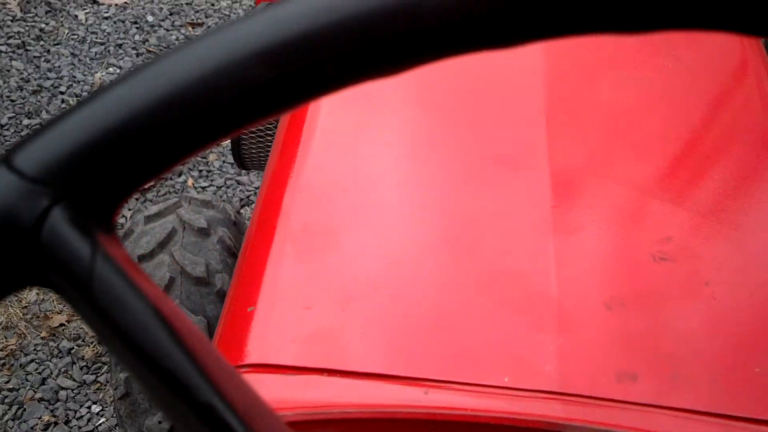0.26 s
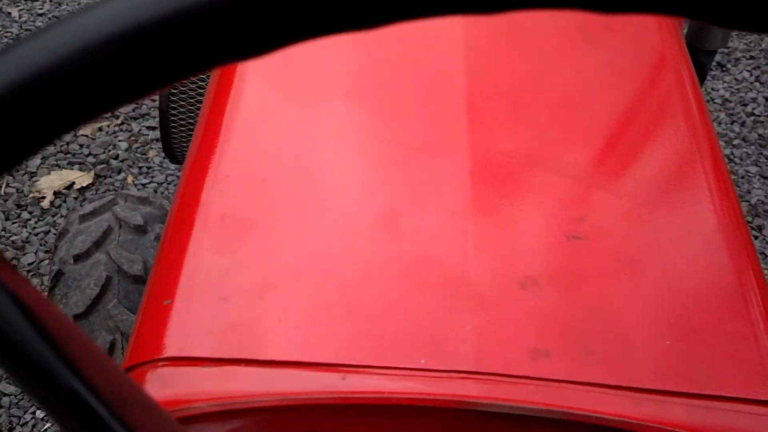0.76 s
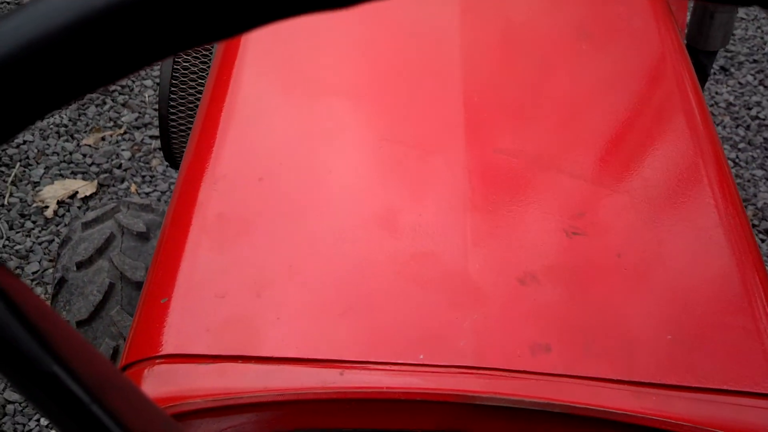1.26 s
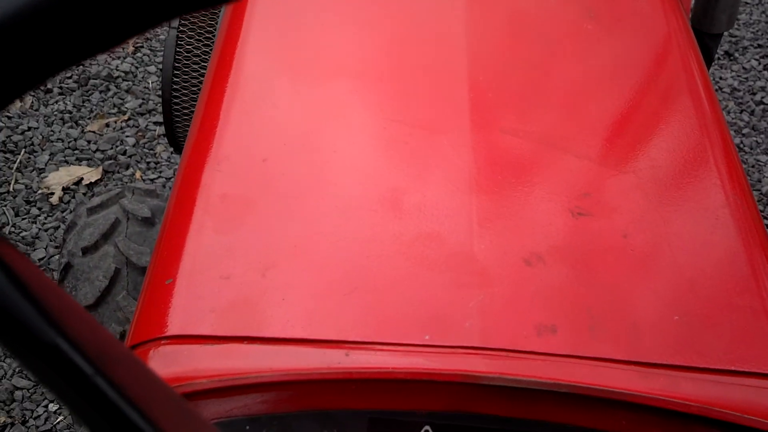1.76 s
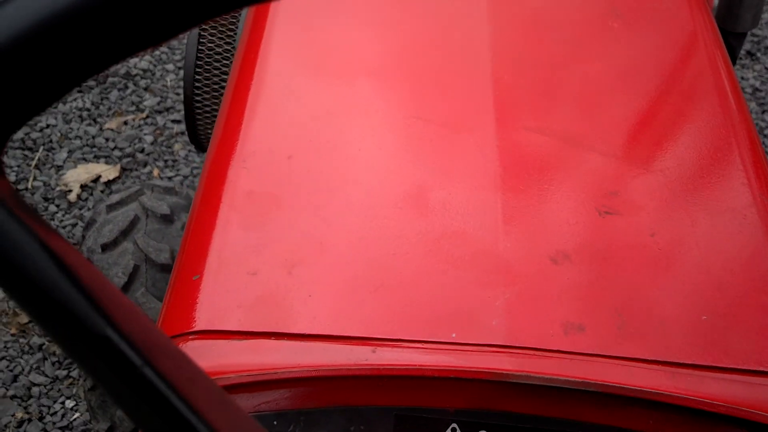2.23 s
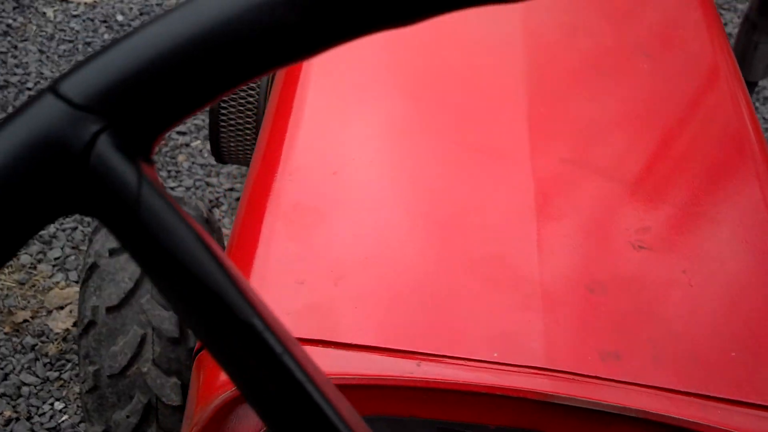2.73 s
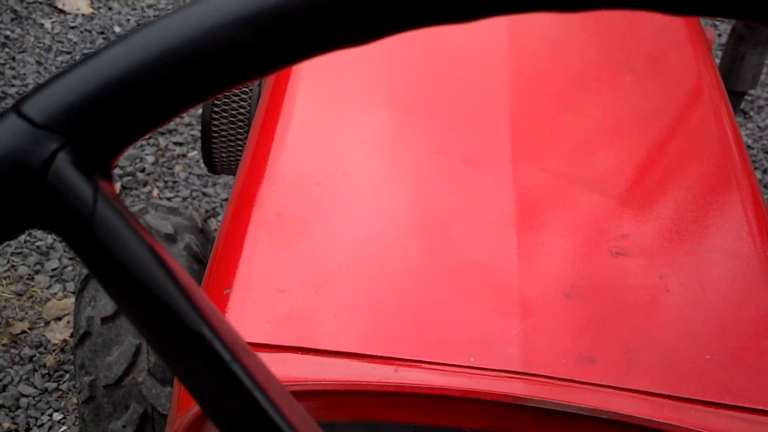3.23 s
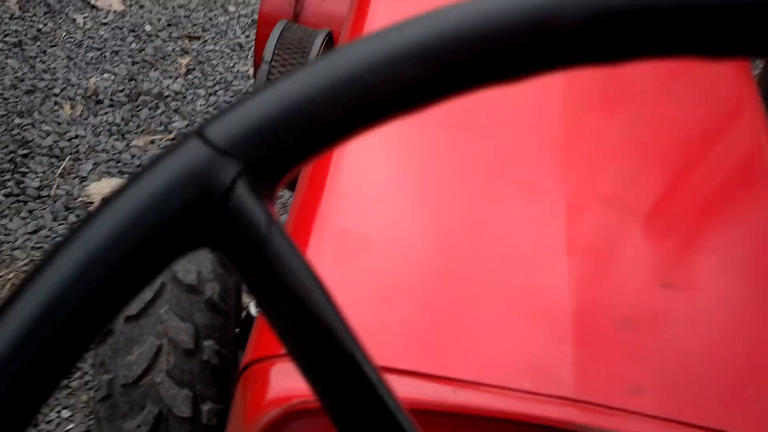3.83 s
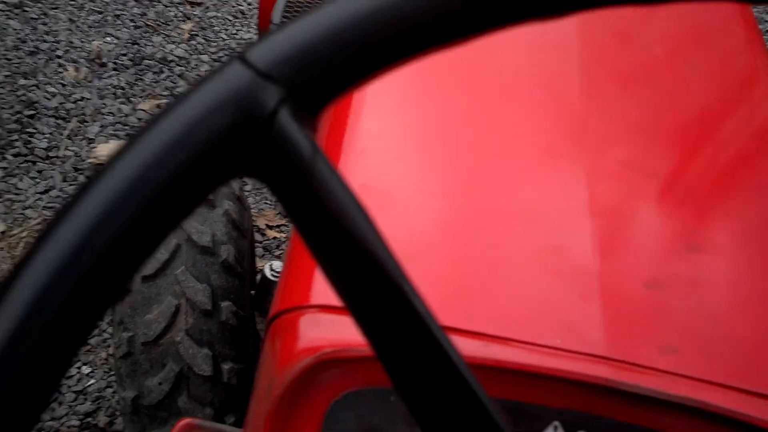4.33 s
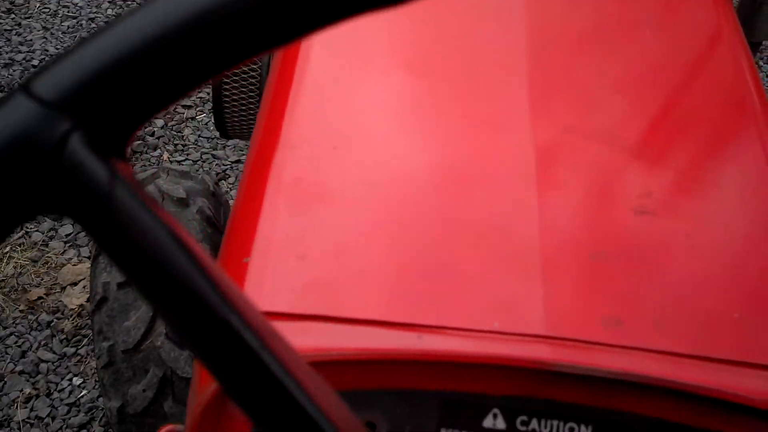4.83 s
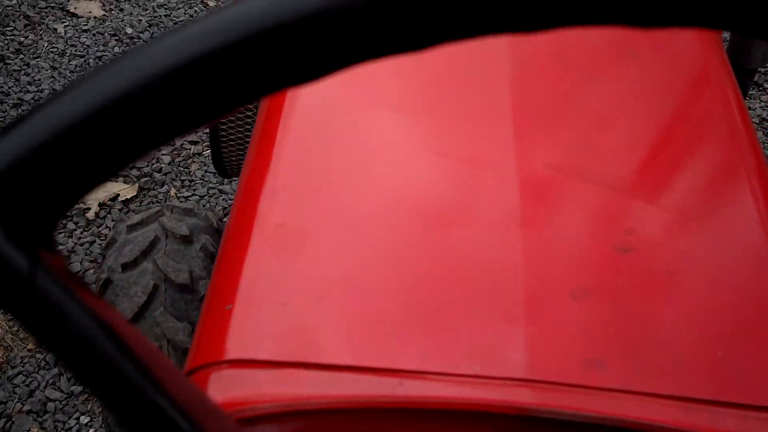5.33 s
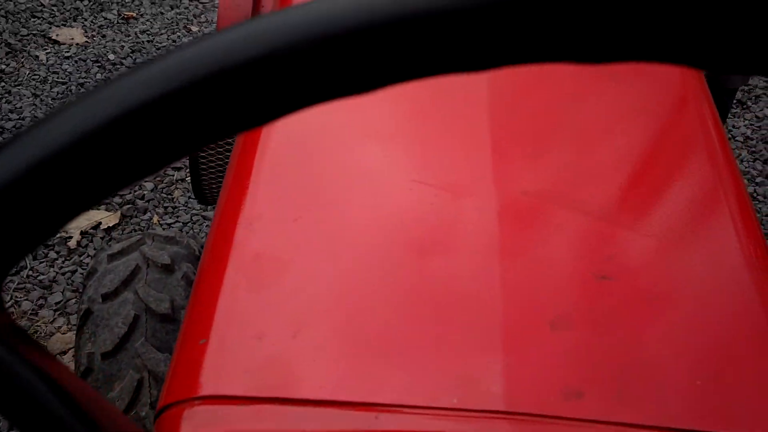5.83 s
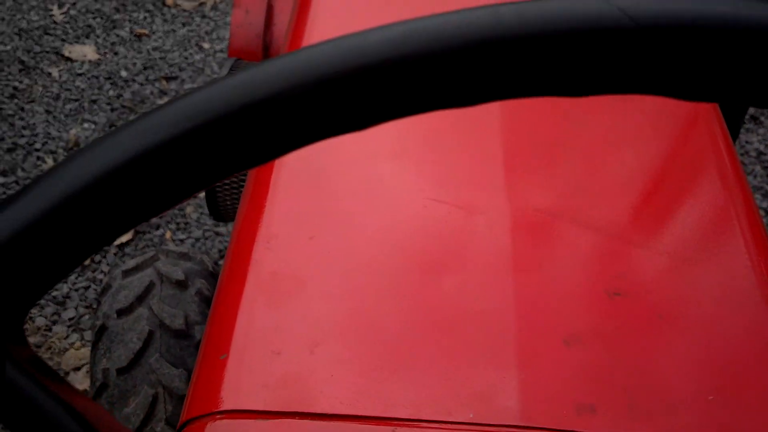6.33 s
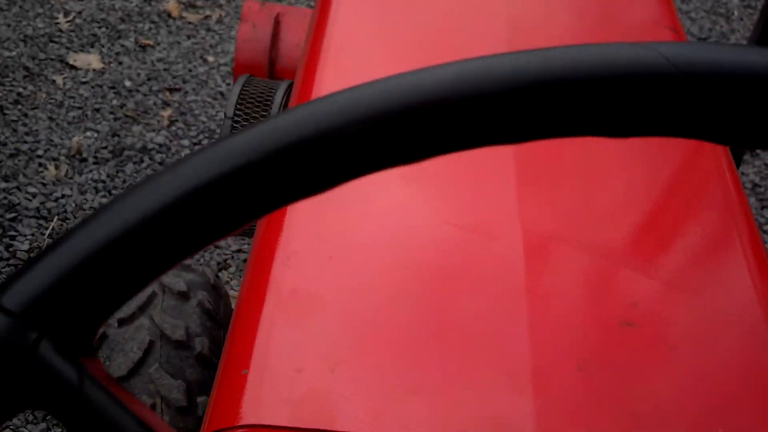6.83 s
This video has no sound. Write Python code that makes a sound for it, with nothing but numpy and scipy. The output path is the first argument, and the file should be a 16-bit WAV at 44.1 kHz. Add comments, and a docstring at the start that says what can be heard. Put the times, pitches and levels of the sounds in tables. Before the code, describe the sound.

A small tractor's electric starter whines and rattles through two cranking tries with thumping compressions, never firing, with bodywork knocks between them outdoors.

```python
"""A key scrapes and a solenoid clacks over a soft outdoor rush: a small tractor is cranked twice from the seat
and does not fire. The starter lurches into mesh, whines up to speed and rattles its gear teeth under the hood
(tooth contacts and tones at the mesh rate); the engine thumps at each compression (tone bursts) and coasts down
in loose clatter (random contacts). Metal rings and chirps (sines), and between the tries the bodywork is
knocked (ringing modes and noise) and thin squeaks judder."""
import sys
import numpy as np
from scipy import signal
from scipy.fft import rfft, irfft, next_fast_len
from scipy.io import wavfile
from scipy.ndimage import map_coordinates

SR = 44100
rng = np.random.default_rng(int(sys.argv[2]) if len(sys.argv) > 2 else 0)


def store_wav(level_fs):
    """Save 16-bit WAV to argv[1]."""
    pcm = np.round(np.clip(np.atleast_2d(level_fs), -1, 1) * 32767)
    wavfile.write(sys.argv[1], SR, pcm.T.astype(np.int16))


N = 312081
T = np.arange(N) / SR  # seconds

# Throughout, t60_s is the time to fall 60 dB, half_s the time from a burst's peak to 1/e,
# and rise_s the time over which a swell climbs its last 7.2 dB. Levels are relative, before the final mix.

# outdoor rush, level over time: start_s, level_db
AIR = [(0, -49.5), (3, -44), (3.3, -44.5), (3.55, -42), (3.8, -39), (4.2, -36.5), (4.75, -37.5),
       (5.2, -45.5), (7.08, -41.5)]
# colour of the outdoor rush: freq_hz, gain_db
OUTDOORS = [(30, -28), (60, -18.5), (100, -8), (160, -2), (300, -1.6), (600, -7.5), (1200, -17.5),
            (2500, -25.5), (5000, -34), (10000, -40.5), (15500, -37)]

# solenoid, key and lever clicks: start_s, level_db, t60_s
CLICKS = [(0.0162, -15, 0.026), (3.029, -44, 0.11), (3.3456, -46, 0.017), (3.5719, -26, 0.015),
          (3.878, -35.5, 0.021), (4.389, -34, 0.052), (4.829, -15.5, 0.03), (7.043, -54, .04)]
# the key scraping in its switch: start_s, level_db, t60_s
KEY_SCRAPES = [(.001, -19, 0.063), (.082, -28, 0.06), (2.457, -20.5, 0.085), (2.57, -41, 0.14),
               (3.031, -49, 0.03), (4.8122, -23, 0.023), (4.872, -34.5, 0.14), (6.686, -21, 0.1)]
# colour of the clicks: freq_hz, gain_db
CLICK_COLOUR = [(200, -13), (600, -10), (1100, 3.5), (2000, 10.5), (3000, 9.5), (4400, 2.5), (6000, 5),
                (9000, 3.5), (12500, 3), (15500, 2.5)]
# colour of the key scrapes: freq_hz, gain_db
SCRAPE_COLOUR = [(2000, -29), (4500, -7), (7500, -10), (9300, 6), (12500, -11), (15500, -2)]

# compression strokes of the engine: start_s, peak_db
STROKES = [(.058, -23), (.688, -20.5), (1.022, -17), (1.34, -16), (1.657, -16), (1.976, -16), (2.298, -15),
           (2.482, -23), (2.665, -22), (4.868, -19), (5.247, -24), (5.902, -18), (6.215, -16), (6.541, -16),
           (6.713, -22), (6.933, -24)]
# the pinion taking up the load or kicking out of mesh: peak_s, level_db, rise_s, t60_s
LURCHES = [(0.065, -19.5, 0.014, 0.21), (4.874, -20, 0.014, 0.24), (6.73, -27.5, 0.0099, 0.42)]
# colour of the lurches and the shudder: freq_hz, gain_db
LURCH_COLOUR = [(40, -18), (90, -60), (170, 4.5), (260, -0.5), (450, -4.5), (900, -9.5), (1700, -11),
                (3000, -24), (6000, -31.5), (12000, -39), (15500, -42)]
# the thump of the intake: pitch_hz, level_db, half_s
INTAKE = [(90, -19, .005), (185, -10.5, .006), (265, -2.5, .007)]
THUMP_DELAY_S = 0.00587  # from the top of the stroke to the intake's thump
THUMP_SCATTER = 0.043  # pitch spread from thump to thump, as a share

# pinion on the ring gear, one curve per try, before load and ripple: start_s, tooth_rate_hz
MESH = [
    [(.1, 340), (.3, 355), (.36, 442), (.42, 514), (.484, 504), (.554, 519), (.615, 512), (.66, 570),
     (1.05, 658), (1.2, 667), (2.46, 665)],
    [(4.95, 340), (5.07, 400), (5.13, 385), (5.18, 455), (5.245, 450), (5.31, 512), (5.35, 518),
     (5.42, 550), (5.6, 580), (6.02, 664), (6.7, 660)],
]
# the tries: takes_hold_s, key_let_go_s, whirr_db
TRIES = [(.1, 2.465, 0), (4.91, 6.7, -2.5)]
FULL_HZ = 668  # tooth rate at full cranking speed
RELEASE_T60_S = 0.11  # the gear noise dies once the key is let go
# speed ripple (Hz, share), jitter (share), added jitter per octave of lower speed (share)
RIPPLE_HZ, RIPPLE, JITTER, SLOW_JITTER = 11.5, .007, .007, .002
# the pinion: teeth, swing of the rasp once a turn (dB), gain of the scrape of its worn flanks (dB)
PINION_TEETH, ECCENTRIC_DB, WEAR_DB = 14, 1.5, -4
# gear noise at full speed (dB) and what it loses per octave of lower speed (dB)
CLATTER_DB, CLATTER_DB_PER_OCT = -26, 15
RASP_DB, RASP_DB_PER_OCT, RASP_STALL_DB = -34, 18.5, 10.5
CHURN_DB, CHURN_DB_PER_OCT, GROAN_DB = -31, 29, -37  # GROAN_DB: floor of the churn at low speed
# a compression loads the gears, lets them go slack, then the crank catches up: delay_s after stroke, width_s
SQUEEZE, SLACK, CATCH_UP = (-0.012, 0.048), (0.047, 0.027), (0.094, 0.027)
SQUEEZE_DB, SLACK_CLATTER_DB, SLACK_CHURN_DB, CATCH_UP_DB = 2, -3, -5, 4.5
# resonances of the starter housing and hood: freq_hz, width_hz, peak_db
HOOD_MODES = [(360, 38, 10), (453, 30, 4), (514, 35, 2.5), (650, 46, 9), (908, 40, 8), (978, 45, 8),
              (1032, 42, 10), (1198, 30, 5), (1328, 55, 7), (1470, 50, 5), (1545, 35, 4.5), (1665, 40, 7),
              (1786, 32, 6), (1981, 90, 6), (2235, 45, 8), (2336, 35, 6), (3010, 80, 8), (3326, 110, 3),
              (3630, 45, 3), (3875, 60, 11), (4135, 55, 8), (4410, 120, 9), (4625, 50, 5), (5394, 97, 8),
              (6890, 140, 7), (7250, 110, 5)]
# overall colour of the starter housing and hood: freq_hz, gain_db
HOOD_COLOUR = [(20, -29), (55, -24), (100, -32.5), (180, 2.5), (270, -1.5), (500, -8.5), (800, -5),
               (1300, -3), (2200, -6.5), (3200, -13.5), (4900, -19.5), (7000, -20.5), (9000, -27.5),
               (13000, -32), (15600, -35)]

# the mesh singing as the motor gathers speed, one curve per try: start_s, level_db
WHINE = [
    [(.12, -46), (.3, -42), (.355, -29), (.42, -27), (.465, -23.5), (.52, -27), (.56, -39), (.605, -28),
     (.66, -36), (.72, -43), (.95, -41)],
    [(4.96, -46), (5.06, -29), (5.145, -42), (5.18, -25), (5.245, -23.5), (5.33, -28), (5.39, -37),
     (5.52, -39), (5.6, -46)],
]
# colour of the teeth grinding under the run-up load: freq_hz, gain_db
GRIND_COLOUR = [(100, -37), (400, -10), (1000, -40), (2200, 2), (3000, -5), (6000, -17), (15000, -26)]
# octave level, tooth rate where overtones are richest, richness lost per octave away from it
WHINE_OCTAVE_DB, HARDEST_HZ, RICHNESS_DB_PER_OCT = -6, 510, 20
OVERTONE_STEP_DB = -2.5  # each higher overtone against the one below
CHATTER = .25  # depth of the tooth chatter on the overtones, as a share

# the whirr at full speed: multiple_of_tooth_rate, level_db, extra_db under load
WHIRR = [(1, -35.5, 5), (2, -39, 1), (3, -49, 3)]
# the starter housing singing along: pitch_hz, level_db, extra_db under load
HOUSING = [(360, -41, -5), (1032, -41, 5), (1667, -48, 2), (1786, -50.5, 2), (3867, -51, 0),
           (4133, -55.5, 0), (4410, -57, 0)]
HOUSING_DRIFT = .17  # phase drift of the housing tones, in turns
# loss per octave of lower speed (dB), throb (dB), phase roughness (radians)
WHIRR_DB_PER_OCT, THROB_DB, WHIRR_ROUGH = 65, 3.2, .5

# the pinion ringing as it springs back, and as the engine rocks: start_s, level_db
PINION_JOLTS = [(2.465, -39), (2.85, -48.5), (6.7, -36)]
PINION_HZ, PINION_T60_S = 1165, 1.9
# slipping metal chirping: peak_s, pitch_hz, level_db, half_s, glide_octaves_per_s
CHIRPS = [(5.546, 480, -19, .004, -8), (5.545, 975, -18, .008, -10), (5.549, 3600, -20, .004, -5),
          (5.555, 3600, -25, .003, -5), (5.556, 3240, -20, .007, -7), (5.65, 800, -37, .05, -1.5),
          (5.65, 1680, -32, .03, 2), (5.73, 1460, -35, .05, -1.3), (6.857, 915, -19.5, .0045, -5)]

# loose parts rattling as the engine runs out and rocks back: peak_s, level_db, rise_s, t60_s
RATTLES = [(2.51, -26, 0.043, 0.57), (2.6, -33.5, 0.025, 0.24), (2.73, -42, 0.034, 0.24),
           (2.83, -36.5, 0.037, 0.41), (2.895, -34.5, 0.041, 0.33), (6.71, -26, 0.095, 1.42),
           (7.05, -35, 0.0075, 0.42)]
# colour of the run-out rattle: freq_hz, gain_db
RUNOUT_COLOUR = [(50, -35), (100, -44), (180, 8.5), (300, 6.5), (600, -3.5), (1100, -2), (1800, -6),
                 (3000, -13), (6000, -25), (12000, -32), (15500, -36)]
# the flywheel ringing under the run-out rattle: freq_hz, width_hz, peak_db
FLYWHEEL = [(1165, 40, 9), (1740, 160, 7)]

# knocks on the bodywork: start_s, level_db, contact_s
KNOCKS = [(3.345, -32.5, .0002), (3.502, -14.5, 0.00027), (3.594, -17, 0.0033), (3.661, -13.5, 0.0047),
          (3.906, -24.5, .0001), (4.389, -27, 0.0003), (7.042, -45, 0.00043)]
# colour of the dull part of the knocks: freq_hz, gain_db
KNOCK_COLOUR = [(60, -49), (130, -12), (240, -4.5), (420, -21), (660, -7), (900, -17), (1200, -16),
                (2000, -25), (4000, -33.5), (8000, -40.5), (15000, -42)]
# modes of a body panel: pitch_hz, level_db, t60_s
PANEL = [(185, -12, .16), (236, -9, .13), (292, -5, .2), (350, -10, .2), (600, -12, .07), (764, -17, .12),
         (1000, -14, .07), (1165, -22, .2), (1800, -18, .06)]
# hollow clunk inside one knock: peak_s, pitch_hz, level_db, half_s, glide_octaves_per_s
CLUNKS = [(3.507, 660, -16.5, .006, 14), (3.511, 255, -23, .006, 0)]

# faint squeaks before the second try: peak_s, pitch_hz, level_db, rise_s, t60_s
SQUEAKS = [(4.645, 3380, -46, .003, .05), (4.664, 3440, -49, .012, .14), (4.671, 6070, -51, .02, .12),
           (4.723, 3380, -43, .003, .11), (4.72, 6070, -54, .003, .06)]

# ring of the engine bay: freq_hz, t60_s
BAY = [(200, 0.11), (1500, 0.27), (6000, 0.24), (14000, 0.036)]
# phase by which the left microphone leads: freq_hz, lead_radians
LEAD = [(0, -2.9), (60, -2.55), (125, -1.65), (250, -.8), (400, -.6), (650, -1.3), (900, -.55), (1378, 0),
        (2000, 1.5), (2756, np.pi), (16536, 11 * np.pi)]
# left level minus right level for the tractor: freq_hz, balance_db
BALANCE = [(100, 0.5), (250, -2), (400, 4), (560, 7.5), (750, 2.5), (1100, 1), (1550, -0.5), (1900, 1),
           (2700, 0), (5500, 0), (8000, -.8)]
TOP_HZ = 15850  # upper band limit


def amp(db):
    """Decibels to gain."""
    return 10 ** (np.asarray(db) / 20)


def unit(x):
    """Scale to rms 1."""
    return x / np.sqrt(np.mean(x ** 2) + 1e-20)


def along(points, hz):
    """Read a (freq_hz, value) curve on a log frequency axis."""
    freq, value = np.transpose(points)
    return np.interp(np.log(hz + 1), np.log(freq + 1), value)


def wobble(rate):
    """A smooth random curve with rate knots a second."""
    return map_coordinates(rng.standard_normal(int(N * rate / SR) + 4), [T * rate])


def filtered(x, response):
    """Multiply the spectrum of x by a complex response of frequency."""
    size = next_fast_len(N + SR // 2, True)
    return irfft(rfft(x, size) * response(np.fft.rfftfreq(size, 1 / SR)), size)[..., :N]


def coloured(x, curve):
    """Pass x through the causal, minimum-phase filter whose gain in dB is curve(hz)."""
    size = 8192
    cepstrum = irfft(np.log(amp(curve(np.fft.rfftfreq(size, 1 / SR)))))
    # folding the cepstrum onto positive time makes the filter causal
    cepstrum[1:size // 2] *= 2
    cepstrum[size // 2 + 1:] = 0
    impulse = irfft(np.exp(rfft(cepstrum)))
    return np.apply_along_axis(signal.oaconvolve, -1, x, impulse)[..., :N]


def noise(colour):
    """Noise of rms 1 with a given colour."""
    return unit(coloured(rng.standard_normal(N), lambda hz: along(colour, hz)))


def impacts(rate, spread_db):
    """Random small contacts of uneven size, about rate a second, at rms 1."""
    hits = rng.random(N) < rate / SR
    return unit(hits * rng.standard_normal(N) * amp(spread_db * rng.standard_normal(N)))


def resonances(modes, hz):
    """Gain in dB of a set of resonant peaks."""
    return sum(db / (1 + (2 * (hz - centre) / width) ** 2) for centre, width, db in modes)


def strike(start, t60, attack=0.00014):
    """The envelope of a blow: a fast exponential attack and a decay that is straight in dB."""
    t = np.maximum(T - start, 0)
    return (1 - np.exp(-t / attack)) * amp(-np.minimum(60 * t / t60, 200))


def swells(rows):
    """Envelopes that rise to a peak and die away, both straight in dB."""
    total = 0
    for peak, db, rise, t60 in rows:
        drop_db = np.maximum(7.2 * (peak - T) / rise, 60 * (T - peak) / t60)
        total = total + amp(db - np.clip(drop_db, 0, 200))
    return total


def blips(rows):
    """Short tone bursts under a bell-shaped envelope, gliding in pitch."""
    out, t = np.zeros(N + SR), np.arange(-SR // 20, SR // 20) / SR
    for peak, hz, db, half, glide in rows:
        turns = np.cumsum(hz * 2 ** (glide * t)) / SR
        tone = np.sin(2 * np.pi * (turns - np.interp(0, t, turns)))
        out[round(peak * SR) - len(t) // 2:][:len(t)] += amp(db) * np.exp(-(t / half) ** 2) * tone
    return out[:N]


def outdoors():
    """A soft low rush: coloured noise, partly different in its two channels."""
    pair = noise(OUTDOORS) + 0.75 * np.array([noise(OUTDOORS), noise(OUTDOORS)])
    level_db = np.interp(T, *np.transpose(AIR))
    return unit(pair) * amp(level_db + 0.77 * wobble(14))


def controls():
    """Sharp noise clicks with a faint metallic tail, and the bright scrape of the key."""
    snaps = sum(amp(db) * (strike(s, t60) + amp(-15) * strike(s, 5.2 * t60)) for s, db, t60 in CLICKS)
    scrapes = sum(amp(db) * strike(s, t60, attack=t60 / 20) for s, db, t60 in KEY_SCRAPES)
    return snaps * noise(CLICK_COLOUR) + scrapes * noise(SCRAPE_COLOUR)


def engine():
    """Noise lurches as the pinion loads or unloads, and a thump and a shudder at every compression."""
    detune = 1 + THUMP_SCATTER * rng.standard_normal(len(STROKES))
    thumps = blips([(s + THUMP_DELAY_S, hz * ratio, stroke_db + mode_db, half, 0)
                    for (s, stroke_db), ratio in zip(STROKES, detune) for hz, mode_db, half in INTAKE])
    # the block shudders as the piston goes over the top
    shudder = amp(-17) * sum(amp(db) * np.exp(-((T - s) / 0.017) ** 2) for s, db in STROKES)
    return (swells(LURCHES) + shudder) * noise(LURCH_COLOUR) + thumps


def tooth_rate():
    """Tooth rate in Hz before load and ripple, over both tries."""
    return np.interp(T, *np.concatenate(MESH).T)


def slowness():
    """Octaves by which the motor runs below full cranking speed."""
    return np.log2(FULL_HZ / tooth_rate())


def each_stroke(phase):
    """A smooth bump at one (delay_s, width_s) phase of every compression, 1 for the strongest stroke."""
    delay, width = phase
    top_db = max(db for s, db in STROKES)
    return sum(amp(db - top_db) * np.exp(-np.minimum(((T - s - delay) / width) ** 2, 50))
               for s, db in STROKES)


def powered():
    """Gain of the starter: up as it takes hold, steady, dying when the key is let go."""
    attack_s = 0.041
    return sum(np.clip((T - on) / attack_s + 1, 0, 1)
               * amp(-np.clip(60 * (T - off) / RELEASE_T60_S, 0, 200)) for on, off, db in TRIES)


def mesh_turns():
    """Count of teeth that have passed; the motor sags against each compression and its speed ripples."""
    sag = .007 * sum(np.exp(-((T - s) / .03) ** 2) for s, db in STROKES)
    ripple = RIPPLE * np.sin(2 * np.pi * RIPPLE_HZ * T + wobble(5))
    jitter = (JITTER + SLOW_JITTER * slowness()) * wobble(110)
    return np.cumsum(tooth_rate() * (1 - sag + ripple + jitter)) / SR


def worn_flanks(turns):
    """The same rough tooth flanks come round with every turn of the pinion: a dense comb of partials."""
    partials, size = 170, 4096
    surface = irfft(np.r_[0, np.exp(2j * np.pi * rng.random(partials))], size)
    return unit(np.interp(turns, np.arange(size) / size, surface, period=1))


def hood(hz):
    """Gain in dB of the starter housing and the hood."""
    return along(HOOD_COLOUR, hz) + resonances(HOOD_MODES, hz)


def gear_noise(teeth):
    """Teeth meet at the mesh rate, rattle in their backlash and ring the hood; faster is louder and brighter."""
    meetings = np.diff(np.floor(teeth), prepend=0) * amp(rng.standard_normal(N))
    rattle = 0.79 * impacts(rate=2000, spread_db=0)
    force = 0.31 * unit(meetings) + rattle + amp(WEAR_DB) * worn_flanks(teeth / PINION_TEETH)
    # each flank of the hood also rattles by itself
    force = force + np.array([impacts(rate=3000, spread_db=1) for flank in range(2)])
    sound = coloured(force, hood)

    # three bands: low churn, middle clatter, high rasp
    low = lambda hz: 1 / (1 + (hz / 520) ** 6)
    high = lambda hz: 1 - 1 / (1 + (hz / 2600) ** 8)
    churn_band = lambda hz: low(hz) * (1 - 0.5 / (1 + (hz / 300) ** 8))
    slow, slack = slowness(), each_stroke(SLACK)
    churn_db = np.maximum(CHURN_DB - CHURN_DB_PER_OCT * slow, GROAN_DB)
    churn_db = churn_db + SLACK_CHURN_DB * slack + CATCH_UP_DB * each_stroke(CATCH_UP)
    clatter_db = CLATTER_DB - CLATTER_DB_PER_OCT * slow
    clatter_db = clatter_db + SQUEEZE_DB * each_stroke(SQUEEZE) + SLACK_CLATTER_DB * slack
    # near a stall the teeth roll rather than scrape
    rasp_db = RASP_DB - RASP_DB_PER_OCT * slow - RASP_STALL_DB * slow ** 4
    # a slightly eccentric pinion scrapes harder once a turn
    rasp_db = rasp_db + ECCENTRIC_DB * np.sin(2 * np.pi * teeth / PINION_TEETH)

    press = amp(1.5 * wobble(45))  # shared flutter of clatter and rasp
    churn = unit(filtered(sound, churn_band)) * amp(churn_db + 1.85 * wobble(35))
    clatter = unit(filtered(sound, lambda hz: 1 - low(hz) - high(hz))) * amp(clatter_db)
    rasp = unit(filtered(sound, high)) * amp(rasp_db + 0.5 * wobble(70))
    return churn + press * (clatter + rasp)


def whine(teeth):
    """The grinding tone of the mesh in the run-up; its overtones flare as they cross the hood's resonances."""
    def partial(order):
        roughness = 0.045 * (order - 1) * wobble(220)
        return np.sqrt(2) * np.sin(2 * np.pi * order * teeth + roughness) * amp(2.7 * wobble(40))

    run_up = sum(amp(np.interp(T, *np.transpose(rows), left=-120, right=-120)) for rows in WHINE)
    # the overtones are richest at the speed where the motor works hardest
    richness = amp(-RICHNESS_DB_PER_OCT * np.abs(np.log2(tooth_rate() / HARDEST_HZ)))
    upper = sum(amp(OVERTONE_STEP_DB * (order - 2)) * partial(order) for order in (3, 4, 5))
    chatter = 1 + CHATTER * wobble(260)
    overtones = amp(WHINE_OCTAVE_DB) * np.sqrt(richness) * chatter * (partial(2) + richness * upper)
    tone = coloured(run_up * (partial(1) + overtones), lambda hz: 0.22 * resonances(HOOD_MODES, hz))
    grind = run_up * amp(-12) * richness * noise(GRIND_COLOUR)
    return tone + grind


def whirr(teeth):
    """At full speed the mesh holds a throbbing tone and the housing sings along; both follow the load."""
    def voice(turns):
        tone = np.sqrt(2) * np.sin(2 * np.pi * turns + WHIRR_ROUGH * wobble(200))
        return tone * amp(THROB_DB * wobble(45))

    times = [s for on, off, db in TRIES for s in (on, off)]
    levels = [db for on, off, db in TRIES for edge in (on, off)]
    try_db = np.interp(T, times, levels)
    load, slow = each_stroke(SQUEEZE) - each_stroke(SLACK), slowness()
    gears = sum(amp(db + load_db * load) * voice(order * teeth) for order, db, load_db in WHIRR)
    housing = sum(amp(db + load_db * load) * voice(hz * T + HOUSING_DRIFT * wobble(25))
                  for hz, db, load_db in HOUSING)
    return amp(try_db) * (gears * amp(-WHIRR_DB_PER_OCT * slow) + housing * amp(-CLATTER_DB_PER_OCT * slow))


def starter():
    """The powered starter: gear noise, run-up whine and full-speed whirr from one count of passing teeth."""
    teeth = mesh_turns()
    return powered() * (gear_noise(teeth) + whine(teeth) + whirr(teeth))


def metal():
    """The pinion rings as a decaying sine when it is jolted, and slipping parts chirp."""
    ring = sum(amp(db) * strike(s, PINION_T60_S, attack=0.003) for s, db in PINION_JOLTS)
    return ring * np.sin(2 * np.pi * PINION_HZ * T) * amp(0.9 * wobble(23)) + blips(CHIRPS)


def run_out_rattle():
    """Loose clatter as the engine runs out: random contacts ringing the hood and the flywheel."""
    def colour(hz):
        return along(RUNOUT_COLOUR, hz) + 0.96 * resonances(HOOD_MODES, hz) + resonances(FLYWHEEL, hz)

    loose = unit(coloured(impacts(rate=1200, spread_db=1.5), colour))
    return loose * swells(RATTLES) * amp(1.7 * wobble(50))


def ringing(blows, modes, attack, scatter_db):
    """Each blow rings decaying sine modes, scattered in level and pitch; a long contact spares the high ones."""
    out, t = np.zeros(N + SR), np.arange(SR // 2) / SR
    hz, db, t60 = np.transpose(modes)[:, :, None]
    for start, blow_db, contact in blows:
        level_chance, pitch_chance = rng.standard_normal((2, len(modes), 1))
        decay = amp(db + scatter_db * level_chance - 60 * t / t60)
        ring = decay * np.sin(2 * np.pi * hz * (1 + 0.025 * pitch_chance) * t)
        ring = np.sum(ring / (1 + (hz * contact) ** 2), axis=0)
        out[round(start * SR):][:len(t)] += amp(blow_db) * ring * (1 - np.exp(-t / attack)) ** 2
    return out[:N]


def bodywork():
    """Knocks on a panel: dull noise thuds with a longer tail, ringing modes, and one hollow clunk."""
    thuds = sum(amp(db) / (1 + (700 * contact) ** 2)
                * (strike(s, 0.053, attack=0.0022) + amp(-7) * strike(s, 0.34)) for s, db, contact in KNOCKS)
    panel = ringing(KNOCKS, PANEL, attack=.001, scatter_db=2)
    return amp(-6) * thuds * noise(KNOCK_COLOUR) + panel + blips(CLUNKS)


def squeaks():
    """Thin stick-slip squeaks: roughened sines whose level judders as they slide."""
    judder = 1 + 0.48 * np.sin(2 * np.pi * 165 * T + wobble(60))
    tones = sum(swells([(s, db, rise, t60)]) * np.sqrt(2) * np.sin(2 * np.pi * hz * T + 0.5 * wobble(250))
                for s, hz, db, rise, t60 in SQUEAKS)
    return judder * tones


def bay(x):
    """Short reflections from engine bay, fenders and ground: a decaying noise tail, separate per channel."""
    hz, t, spectrum = signal.stft(rng.standard_normal((2, SR // 5)), SR, nperseg=128)
    decay = amp(-60 * t / along(BAY, hz)[:, None])
    tail = signal.istft(spectrum * decay, SR, nperseg=128)[1]
    return signal.oaconvolve(np.atleast_2d(x), tail / np.linalg.norm(tail[0]), axes=1)[:, :N]


def widened(ports, balance):
    """The microphone pair widens its stereo with a short delay: mid and side take turns along the spectrum."""
    half_lead = lambda hz: np.interp(hz, *np.transpose(LEAD)) / 2
    mid, side = filtered(ports, lambda hz: np.array([np.cos(half_lead(hz)), 1j * np.sin(half_lead(hz))]))
    left_right = np.array([mid + side, mid - side])
    return filtered(left_right, lambda hz: amp(np.outer([.5, -.5], balance(hz))))


def scene():
    """The tractor with its reflections; the outdoor rush lies a little to the right."""
    rush = widened(outdoors(), lambda hz: -4.5 / (1 + (hz / 1500) ** 2))
    small = controls() + engine() + metal() + run_out_rattle() + bodywork() + squeaks()
    machine = starter()
    tractor = amp(-1.5) * (machine + small) + bay(amp(-13) * machine + amp(-12) * small)
    return widened(tractor, lambda hz: along(BALANCE, hz)) + rush


def record(dry):
    """Thin the deep bass with a second-order high-pass and keep nothing above the band limit."""
    bass_hz = 35
    return filtered(dry, lambda hz: (1j * hz / (bass_hz + 1j * hz)) ** 2 * (hz < TOP_HZ))


dry = scene()
out = record(dry)
store_wav(out)
```